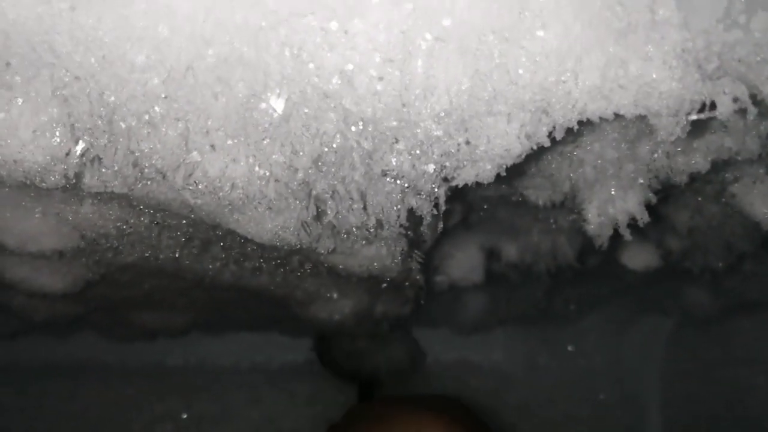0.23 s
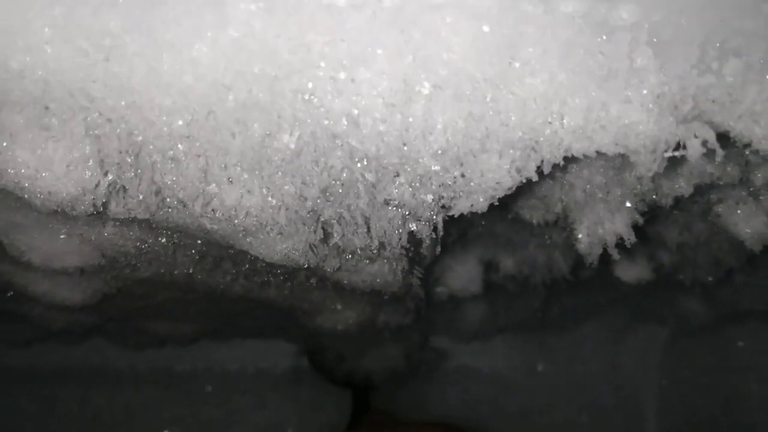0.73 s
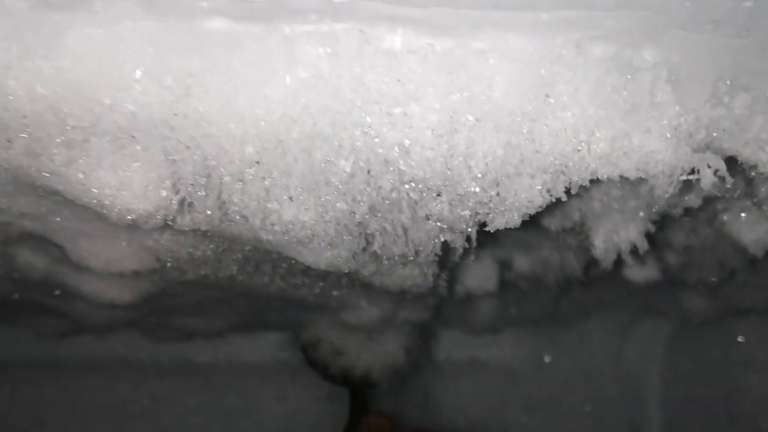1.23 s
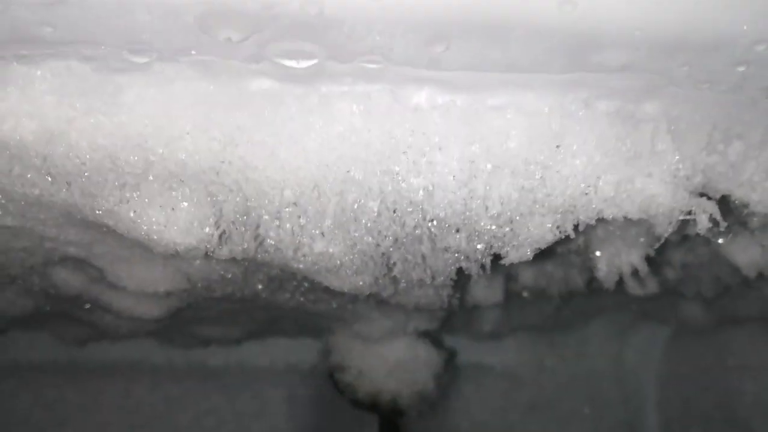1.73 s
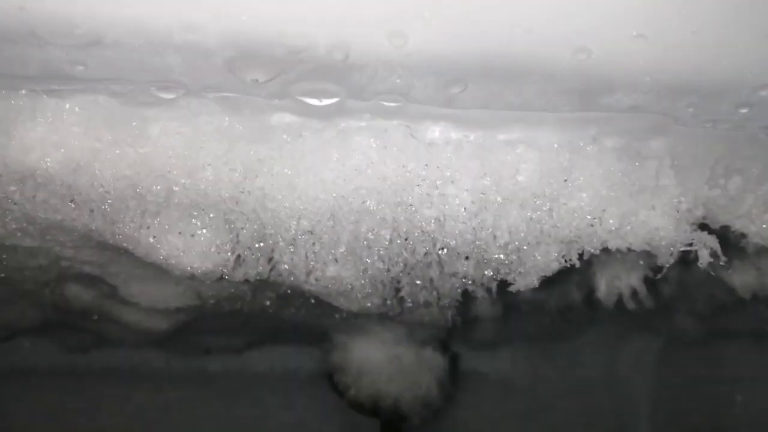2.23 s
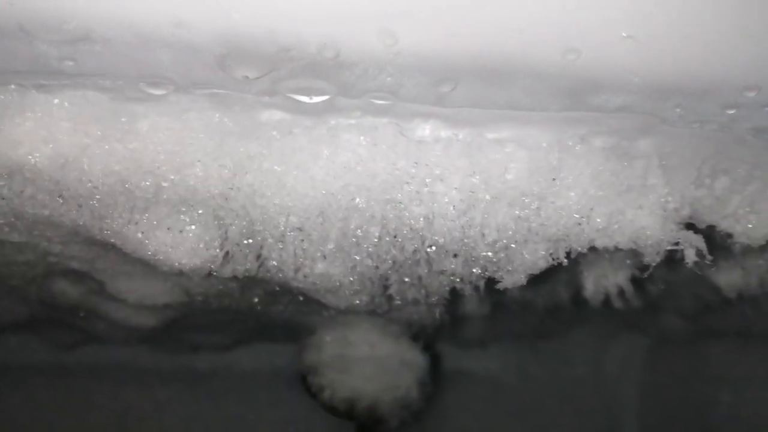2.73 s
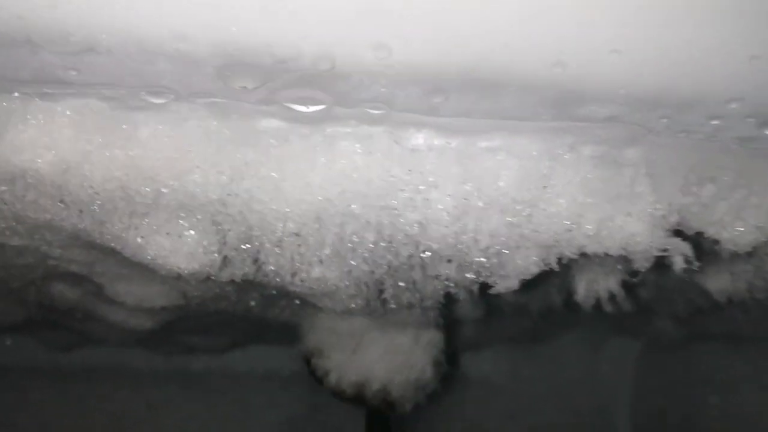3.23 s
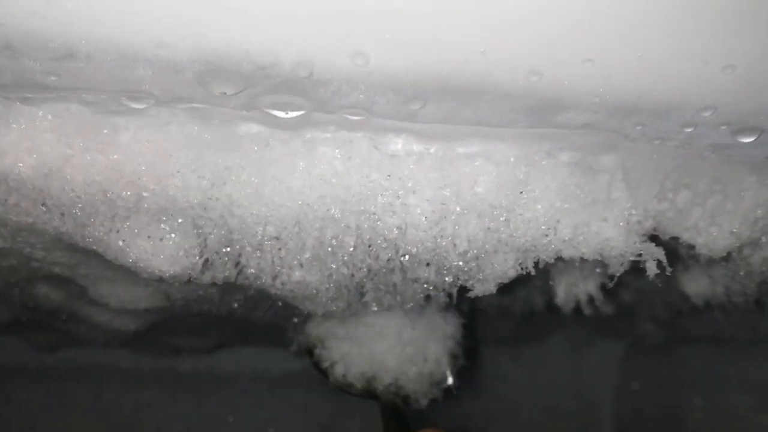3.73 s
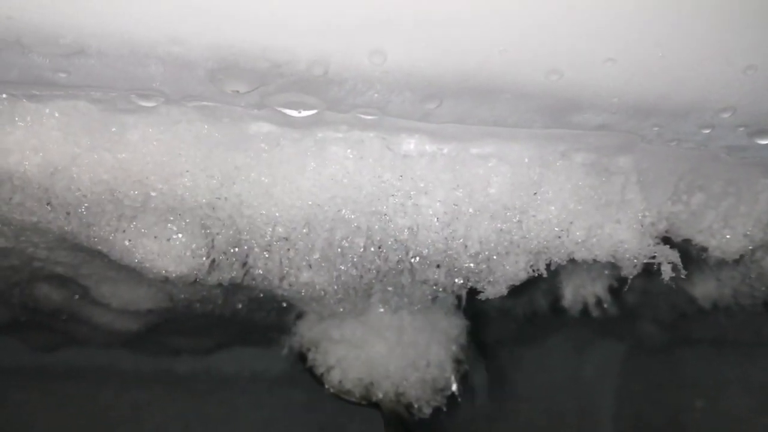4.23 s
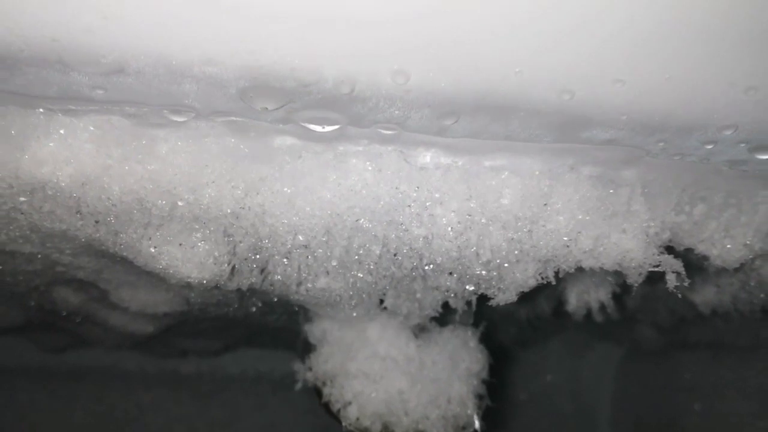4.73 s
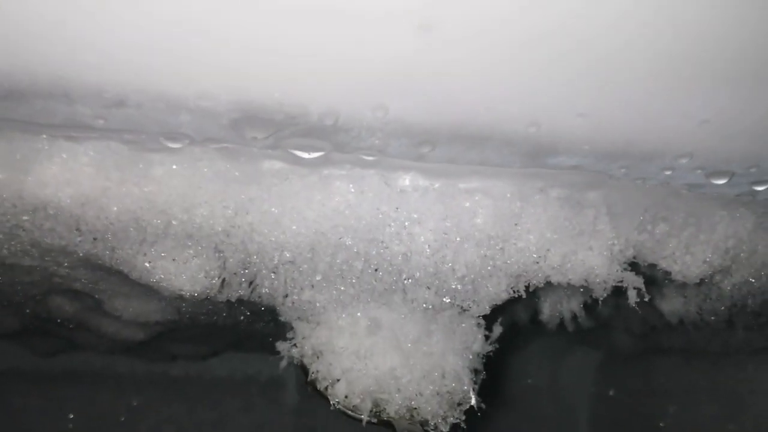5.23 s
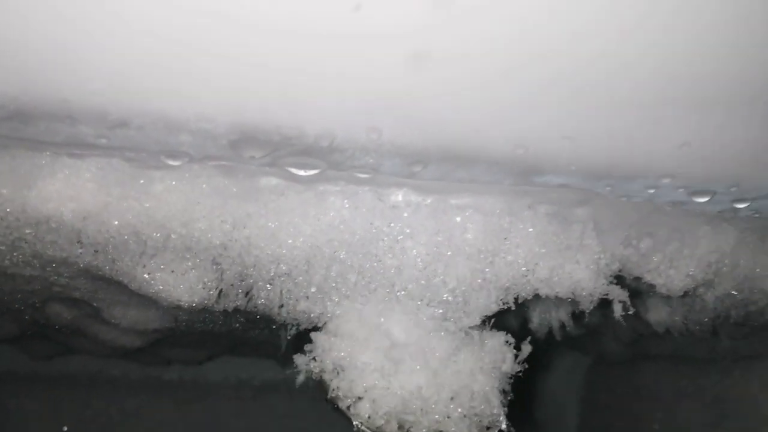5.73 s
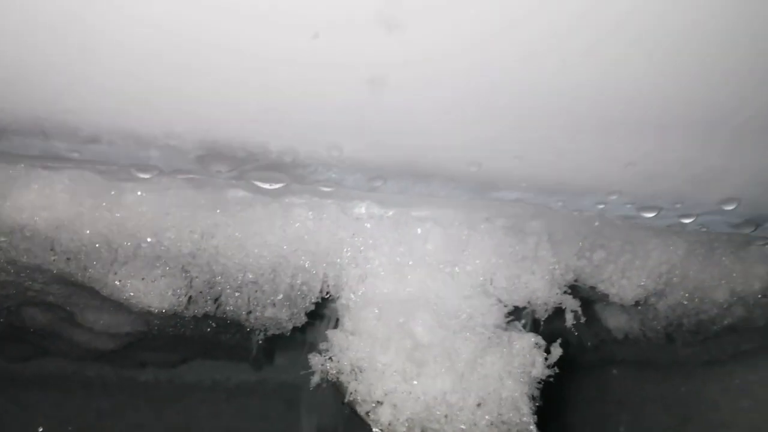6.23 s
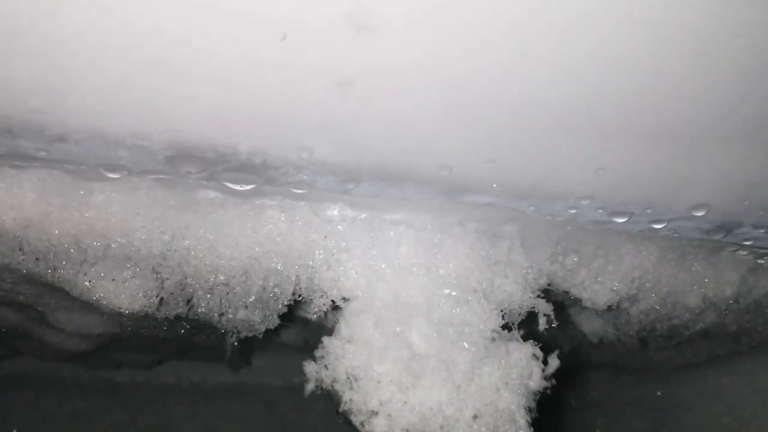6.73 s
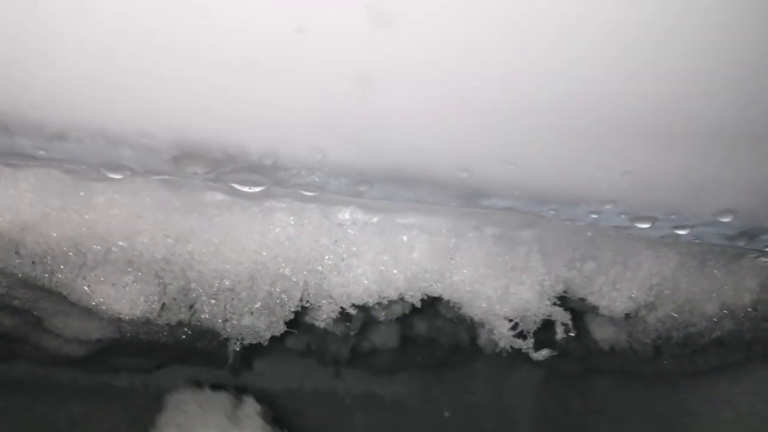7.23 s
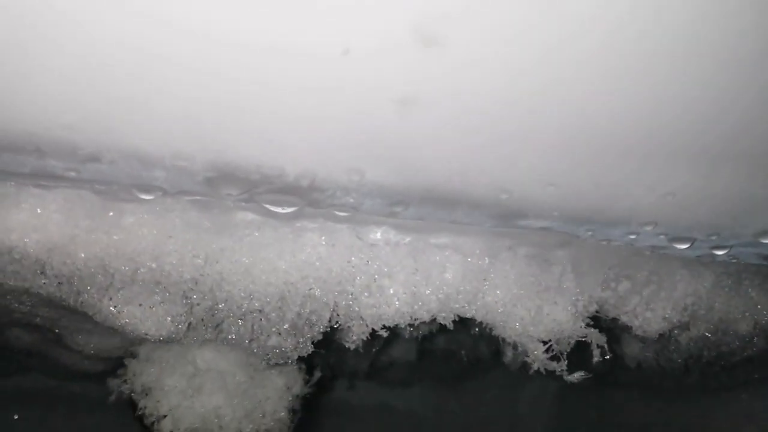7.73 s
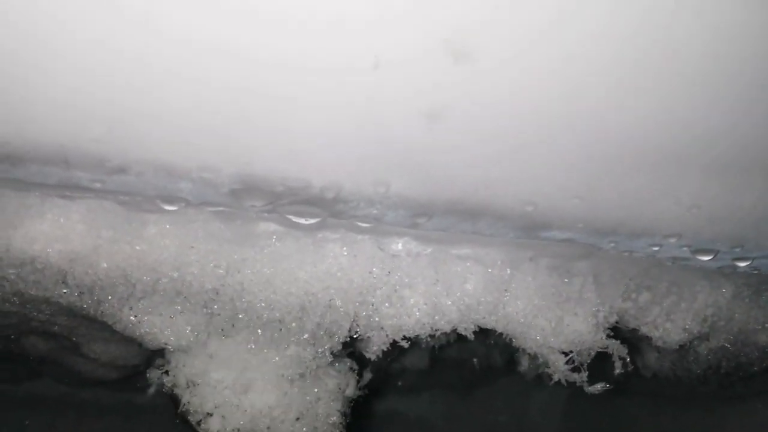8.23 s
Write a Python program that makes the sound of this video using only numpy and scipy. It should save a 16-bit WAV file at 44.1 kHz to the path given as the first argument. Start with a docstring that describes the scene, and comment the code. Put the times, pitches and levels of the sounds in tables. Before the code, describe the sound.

Close, scratchy scraping of thick ice, uneven and crackling with hollow booms, stops for half a second, then restarts softer above quiet appliance rumble.

```python
"""A blade scrapes thick frost off the wall of a freezer, close to the left microphone, over faint hum and hiss.
From the start crushed ice grains ring the wall, the blade and the air of the cabinet; the stroke slips and
sticks, and lumps of ice thud between about 1 and 3 s. Near 6.8 s the stroke pauses, fingers nudge the right
microphone in low bumps and crystals snap; near 7.4 s the scraping resumes further along, with late snaps.
Noise, sparse clicks and short bursts drive resonances; thuds and bumps are shaped sines."""
import sys
import numpy as np
from scipy import signal
from scipy.io import wavfile

SR = 44100
rng = np.random.default_rng(int(sys.argv[2]) if len(sys.argv) > 2 else 0)


def generate_wav(signal):
    """Clip the signal to [-1, 1] and save it as 16-bit WAV at the path in sys.argv[1]."""
    frames = np.transpose(np.atleast_2d(signal))
    scaled = np.clip(frames, -1, 1) * 32767
    pcm = np.round(scaled).astype(np.int16)
    wavfile.write(sys.argv[1], SR, pcm)


N = 374364
T = np.arange(N) / SR
STEPS = np.arange(0, N, 128) / SR  # coarse times for slow controls, s


def gain_of(db):
    """Logarithmic level: decibels become an amplitude ratio."""
    return 10 ** (np.asarray(db) / 20)


def evened(x):
    """Normalization: the signal is scaled to an rms of one."""
    return x / np.sqrt(np.mean(x ** 2) + 1e-20)


def curve(points, t):
    """Linear interpolation of a table of times and values."""
    return np.interp(t, *np.transpose(points))


def read(points, hz):
    """Interpolation of a spectrum on a logarithmic frequency axis."""
    f, value = np.transpose(points)
    return np.interp(np.log(hz + 1), np.log(f + 1), value)


def wander(per_s, t):
    """Random modulation: normal deviates, per_s of them a second, joined by straight lines."""
    knots = rng.standard_normal(4000)
    return np.interp(t * per_s, np.arange(len(knots)), knots)


def shuffled(x):
    """Decorrelation: the same grains push with random signs."""
    return x * rng.choice([-1., 1.], N)


def ring(x, hz, width, count=2):
    """Resonance with a peak gain of one; two passes give steep skirts."""
    b, a = signal.iirpeak(hz, hz / width, SR)
    for _ in range(count):
        x = signal.lfilter(b, a, x)
    return x


def spin(turns):
    """Phasor: a pointer of unit length that has made so many turns."""
    angle = (2 * np.pi * (turns % 1)).astype(np.float32)
    return np.cos(angle) + 1j * np.sin(angle)


def glide(x, hz, width):
    """Heterodyned resonance of moving pitch: shift to zero, smooth twice, shift back; complex result."""
    turn, r = spin(np.cumsum(hz) / SR), np.exp(-np.pi * width / SR)
    shifted = x * np.array([turn.real, -turn.imag])
    along, across = signal.lfilter([(1 - r) ** 2], [1, -2 * r, r * r], shifted)
    return 2 * turn * (along + 1j * across)


def add(mix, s, sound):
    """Superposition: a sound is summed in from time s."""
    part = mix[..., round(s * SR):][..., :sound.shape[-1]]
    part += sound[..., :part.shape[-1]]


def placed(x, right_db):
    """Level difference between channels: the right gets the same wave scaled by right_db."""
    return np.array([x, gain_of(right_db) * x])


# spectrum of the background: pitch_hz, relative density_db (per Hz)
HUM_SPECTRUM = [(15, -15), (33, -8), (50, -30), (106, -11.5), (168, -29.5), (276, -27), (329, -29),
                (524, -32), (910, -37.5), (1830, -41), (8090, -49.5), (14500, -49.5), (15800, -39)]
# level difference of the background: pitch_hz, left_over_right_db
HUM_LEFT_OVER_RIGHT = [(30, 8.5), (60, -17), (130, 8), (640, 6), (3100, 5), (6800, 7), (12500, 6),
                       (14800, 11)]
# coherence of the two channels: pitch_hz, likeness (0-1)
HUM_LIKENESS = [(30, 0.28), (130, 1), (290, 0.73), (640, 0.046)]
HUM_RMS_DB = -56.5  # over both channels


def hum():
    """Shaped noise of partial coherence: low appliance rumble and microphone hiss, lumpy under 70 Hz."""
    frames, hz = N // 512 + 5, np.fft.rfftfreq(2048, 1 / SR)
    t = np.arange(frames) * 512 / SR
    a, b, c, d = rng.standard_normal((frames, 1025, 4)).T
    likeness = np.clip(read(HUM_LIKENESS, hz), -1, 1)[:, None]
    left, other = a + 1j * b, c + 1j * d
    right = likeness * left + np.sqrt(1 - likeness ** 2) * other
    lumps_db = 3.1 * wander(10.0, t) * (hz < 70)[:, None]
    tilt_db = read(HUM_LEFT_OVER_RIGHT, hz)[:, None] / 2
    level_db = read(HUM_SPECTRUM, hz)[:, None] + lumps_db + np.array([tilt_db, -tilt_db])
    z = np.array([left, right]) * gain_of(level_db)
    noise = signal.istft(z, nperseg=2048, noverlap=1536)[1][:, :N]
    return gain_of(HUM_RMS_DB) * evened(noise)


def cabinet(x):
    """Reverberation: a small hard-walled box answers with sparse taps that decay exponentially."""
    t = np.arange(SR // 5) / SR
    signs = rng.choice([-1., 1.], (2, len(t)))
    taps = signs * (rng.random((2, len(t))) < .05) * gain_of(-60 * t / 0.16)  # t60 0.16 s
    return signal.oaconvolve(x, taps / np.linalg.norm(taps[0]), axes=1)[:, :N]


# fingers nudge the right microphone: start_s, peak_db, pitch_hz, length_s
NUDGES = [(6.757, -38, 56.4, 0.02), (7.124, -46, 74.4, 0.066), (7.212, -50, 50, 0.047),
          (7.46, -42, 40, 0.05)]


def bumps():
    """Transient displacement: each bump is a windowed slow sine, on the right only."""
    out = np.zeros((2, N))
    for s, db, hz, length in NUDGES:
        t = np.arange(0, length, 1 / SR)
        window = signal.windows.tukey(len(t), .6)
        add(out[1], s, -gain_of(db) * np.sin(2 * np.pi * hz * t) * window)
    return out


# single crystals snap: start_s, left peak_db, pitch_hz, width_hz
CRYSTAL_SNAPS = [(6.785, -42, 5540, 2200), (7.068, -46, 15000, 3000), (7.331, -34.5, 8550, 2560),
                 (8.256, -31.5, 8700, 2500), (8.417, -33, 15000, 1200), (8.457, -30, 15000, 1200)]


def snaps():
    """Impulsive fracture: a brief decaying noise burst excites a bright resonance."""
    out, t = np.zeros((2, N)), np.arange(SR // 5) / SR
    for s, db, hz, width in CRYSTAL_SNAPS:
        burst = rng.standard_normal(len(t)) * gain_of(-60 * t / 0.016)  # t60 0.016 s
        snap = ring(burst, hz, width)
        add(out, s, placed(gain_of(db) * snap / abs(snap).max(), -28.0))
    return out


# a lump of ice thuds on the wall: time_s, level_db (before rise and decay), pitch_hz, t60_s
ICE_THUDS = [(0.988, -16.5, 585, 0.1), (1.259, -4.5, 395, 0.089), (1.534, -19.5, 392, 0.07),
             (2.852, -26, 282, 0.38), (2.853, -25.5, 132, 0.47), (3.111, -5, 346, 0.027)]


def thuds():
    """Damped free vibration: a sine swells over 9.1 ms while it decays exponentially."""
    out, t = np.zeros((2, N)), np.arange(SR // 5) / SR
    for s, db, hz, t60 in ICE_THUDS:
        envelope = gain_of(db - 60 * t / t60) * np.minimum(t / 0.0091, 1)
        add(out, s - .008, placed(envelope * np.sin(2 * np.pi * hz * t), -10.0))
    return out


# pressure of the stroke as the scrape level: time_s, level_db (before any ringing)
STROKE_LEVEL = [(0, -60.5), (.15, -52.5), (.21, -39.5), (.34, -34), (1.1, -31.5), (1.3, -34.5), (1.6, -41),
                (1.67, -35), (1.825, -32.5), (1.85, -40), (2.0, -40.5), (2.37, -36), (2.39, -29),
                (2.47, -28.5), (2.56, -41.5), (2.64, -46), (2.83, -42), (2.93, -39.5), (3.08, -31),
                (3.7, -31.5), (3.81, -42), (4.43, -42), (4.6, -45), (4.8, -32), (4.91, -33.5), (5.0, -39.5),
                (5.42, -43.5), (5.53, -35), (5.93, -40.5), (6.3, -43), (6.57, -56), (6.6, -62.5),
                (6.66, -64.5), (6.785, -53), (6.81, -86), (7.32, -81), (7.35, -69), (7.4, -74),
                (7.43, -67.5), (7.47, -53.5), (7.55, -49), (7.72, -42), (8.0, -40), (8.49, -45.5)]
AVERAGE_STROKE_DB = -40


def pressure_db(t):
    """Relative level: how far the stroke is over an average one."""
    return curve(STROKE_LEVEL, t) - AVERAGE_STROKE_DB


# mode of the cabinet air: pitch_hz, width_hz, right_under_left_db
AIR_MODE = (128, 10, -10.5)
# mode of the wall panel: pitch_hz, width_hz, right_under_left_db
PANEL_MODE = (281.2, 70, -8.5)
# the hand heaves on the wall and the air booms: time_s, top_db (before BOOM_GAIN_DB)
HEAVE_SWELLS = [(.52, -39), (.83, -38), (1.22, -29), (1.77, -35.5), (2.19, -33.5), (2.47, -36.5),
                (3.1, -32), (3.3, -33.5), (3.53, -44), (3.9, -37.5), (4.35, -34.5), (4.539, -33),
                (4.87, -38.5), (5.87, -34.5), (8.0, -48), (8.27, -42)]
# wall panel at an average stroke: time_s, level_db (before BOOM_GAIN_DB)
PANEL_CURVE = [(.3, -58), (1.3, -49), (1.9, -44), (2.4, -49.5), (3.0, -47.5), (3.5, -50), (3.9, -46),
               (4.8, -48), (5.5, -41.5), (6.3, -42.5), (7.5, -45.5)]
HEAVE_RISE_DB_PER_S, HEAVE_FALL_DB_PER_S = 93, 220
AIR_DB, AIR_PER_DB = -51, 0.78  # at an average stroke, before BOOM_GAIN_DB; dB per dB of pressure
BOOM_GAIN_DB = 5.0


def boom():
    """Forced resonance: jerks of the hand ring cabinet air and wall panel with the stroke; heaves swell the air."""
    s, top_db = np.transpose(HEAVE_SWELLS)[:, :, None]
    rise_db = HEAVE_RISE_DB_PER_S * np.maximum(s - STEPS, 0)
    fall_db = HEAVE_FALL_DB_PER_S * np.maximum(STEPS - s, 0)
    swell_db = (top_db - rise_db - fall_db).max(0)
    air = np.hypot(gain_of(AIR_DB + AIR_PER_DB * pressure_db(STEPS)), gain_of(swell_db))
    wall = gain_of(curve(PANEL_CURVE, STEPS) + pressure_db(STEPS))
    out = np.zeros((2, N))
    for (hz, width, right_db), level, count in zip((AIR_MODE, PANEL_MODE), (air, wall), (1, 2)):
        impulses = rng.standard_normal(N) * (rng.random(N) < 1500 / SR)  # about 1500 a second
        jerks = ring(impulses, 1.118 * hz, 170)
        unit = np.std(ring(jerks, hz, width, count=count))
        driven = ring(jerks * np.interp(T, STEPS, level), hz, width, count=count)
        out += placed(driven / unit, right_db)
    return gain_of(BOOM_GAIN_DB) * out


# loose powder heaps on the blade: time_s, level_db (over the stroke, before SCRAPE_GAIN_DB)
POWDER_LEVEL = [(.1, -3), (.5, -8), (3.7, -10.5), (4.6, -4), (6.0, 9), (6.5, 6.5), (7.6, -2)]
POWDER_HZ, POWDER_WIDTH_HZ = 4570, 1870


def powder(drive):
    """Heavily damped response: loose powder has no ring of its own, only a wide hiss."""
    hiss = ring(drive * gain_of(curve(POWDER_LEVEL, T)), POWDER_HZ, POWDER_WIDTH_HZ)
    return placed(hiss, -28.0)


CRYSTAL_LO_HZ, CRYSTAL_HI_HZ, CRYSTAL_WIDTH_HZ = 996, 5480, 108
CRYSTALS_PER_S = 2500  # average, all pitches together
CRYSTAL_DB, CRYSTAL_TILT_DB = 4, -10.5  # before SCRAPE_GAIN_DB; tilt spread over the pitches, low to high


def crystals(drive, count=14):
    """Random impulse excitation: some grains break off whole, each pinging at one of 14 pitches."""
    which, out = rng.integers(0, count, N), np.zeros(N)
    loose = drive * (rng.random(N) < CRYSTALS_PER_S / SR) * np.sqrt(SR / CRYSTALS_PER_S)
    for k, hz in enumerate(np.geomspace(CRYSTAL_LO_HZ, CRYSTAL_HI_HZ, count)):
        ping = ring(loose * (which == k), hz, CRYSTAL_WIDTH_HZ, count=1)
        out += gain_of(CRYSTAL_TILT_DB * k / count) * ping
    return placed(gain_of(CRYSTAL_DB) * np.sqrt(count) * out, -20.0)


# the blade's ring bends with its angle: time_s, pitch_hz, level_db (before SCRAPE_GAIN_DB)
BLADE_RING = [(0, 3330, 16), (.36, 3380, 13), (.6, 3420, 10), (1.2, 3170, -2), (2.9, 2970, 10.5),
              (3.5, 2890, -1), (4.6, 2630, 7), (5.3, 2970, 14), (6.3, 2956, 22.5), (6.55, 3100, 18),
              (6.78, 2850, 17), (7.35, 3130, 26.5), (7.45, 3140, 6)]


def blade(drive, width=220):
    """Time-varying resonance: the pitch of the blade's ring follows its angle."""
    s, hz, db = np.transpose(BLADE_RING)
    tone = glide(drive * gain_of(np.interp(T, s, db)), np.interp(T, s, hz), width)
    return placed(tone.real, -27.0)


# the blade breaks free and crunches: start_s, level_db (of force), length_s
BLADE_SLIPS = [(0.277, -43, 0.029), (0.335, -29.5, 0.0094), (0.442, -34.5, 0.0064), (0.553, -35, 0.0052),
               (0.744, -27.5, 0.0035), (0.85, -41, 0.0051), (1.246, -37, 0.028), (1.529, -35.5, 0.0078),
               (1.589, -35, 0.01), (1.646, -41, 0.0061), (1.786, -33, 0.0097), (2.118, -32, 0.0049),
               (2.164, -41, 0.009), (2.203, -33, 0.0086), (2.232, -32.5, 0.0064), (2.263, -34, 0.0089),
               (2.301, -35.5, 0.013), (2.608, -31.5, 0.0076), (2.728, -30, 0.0036), (2.783, -39.5, 0.011),
               (2.798, -32, 0.0078), (2.84, -25.5, 0.0081), (2.918, -32.5, 0.0088), (2.944, -31, 0.0048),
               (2.956, -26, 0.0043), (2.992, -33, 0.013), (3.249, -29.5, 0.0093), (4.505, -34, 0.013),
               (4.542, -36, 0.011), (4.615, -42, 0.0073), (4.654, -28, 0.009), (4.677, -37, 0.011),
               (4.708, -36.5, 0.007), (4.724, -33, 0.0068), (4.766, -27, 0.008), (4.8, -31, 0.0067),
               (5.904, -40, 0.018), (6.396, -52, .005), (6.493, -50, 0.004), (6.547, -45.5, .006),
               (7.111, -65.5, 0.027), (7.329, -59, 0.0072)]
# the blade hangs for an instant: centre_s, length_s, dip_db
BLADE_STICKS = [(0.272, 0.03, -16), (0.319, 0.0099, -20), (1.21, 0.015, -15), (1.227, 0.013, -9),
                (1.521, 0.014, -10), (1.578, 0.011, -5), (1.626, 0.038, -6), (2.183, 0.012, -5),
                (2.245, 0.11, -8.5), (2.89, 0.097, -11), (4.245, 0.06, -8.5), (4.694, 0.066, -8.5),
                (4.747, 0.025, -6), (4.481, 0.051, -17), (4.529, 0.046, -25), (4.59, 0.099, -15),
                (4.939, 0.046, -19), (7.591, 0.06, -11)]


def crunch():
    """Stick-slip friction: crushed grains are dense clicks of uneven size, in clumps, slips and stalls."""
    grains = rng.standard_normal(N) * gain_of(3.08 * np.minimum(rng.exponential(1, N), 6))
    clumps = gain_of(2.0 * wander(150, T) + 1.46 * wander(45, T))
    force = gain_of(curve(STROKE_LEVEL, T)) * evened(clumps)
    for s, length, db in BLADE_STICKS:
        near = slice(max(round((s - length) * SR), 0), round((s + length) * SR))
        force[near] *= gain_of(db * np.exp(-((T[near] - s) / (length / 2)) ** 4))
    t = np.arange(SR // 10) / SR
    for s, db, length in BLADE_SLIPS:  # sudden start, a sagging hold, a quick end
        hold_db = db - 5 * t / length - 44000 * np.maximum(t - length, 0)
        add(force, s - .001, gain_of(hold_db) * np.minimum(t / 0.00048, 1))
    return evened(grains) * force


DRIFT, DRIFT_PER_S = .014, 12  # share by which a mode's pitch typically strays, and how often


def mode(drive, hz, width, db, right_db):
    """Modal response under a shifting contact: pitch and level stray, and phase drifts at the right."""
    pitch = hz * (1 + DRIFT * wander(DRIFT_PER_S, T))
    level = gain_of(db + 2.65 * wander(7, STEPS))
    x = glide(drive * np.interp(T, STEPS, level), pitch, width)
    phase = min(hz / 1200, 1) * (2.1 * rng.standard_normal() + 0.67 * wander(14, STEPS))  # radians
    turned = x * spin(np.interp(T, STEPS, phase / (2 * np.pi)))
    return np.array([x.real, gain_of(right_db) * turned.real])


# where the blade is along the wall: time_s, place (0-4)
BLADE_PLACE = [(0, 2.23), (.4, 0), (1.3, 0), (1.9, 1.28), (2.4, 2.63), (2.7, 0.5), (3, 2.1), (3.4, 1.5),
               (3.75, 2.5), (4.4, 2), (7.36, 2), (7.4, 4)]
# what the scraping rings: pitch_hz, width_hz, level_db at places 0 to 4 (five columns), right_under_left_db
BODY_MODES = [(163.5, 31, 24.5, 27, 17, 13, 20, -4.5), (386, 127, 27.5, 23.5, 7.5, 11, 1, -7.5),
              (474.6, 93, 25, 24.5, 10.5, 22, 16, -8.5), (559, 77, 28.5, 16.5, 7.5, 10, 11.5, -0.5),
              (655, 182, 28.5, 22.5, 17, 11, 15, -5.5), (850, 103, 24, 23, 10, 15, 9.5, -23.5),
              (970, 160, 23.5, 14, 15, 15, 11, -6.5), (1270, 390, -6, -3, 4.5, -12, 6, -7),
              (1563, 177, 17.5, 13, 9.5, 9, 15.5, -19.5), (1729, 57, 12, 3, 12, 14, 6, -10),
              (1863, 194, 9.5, 9, 5.5, 7, 6, -18.5), (2346, 406, -4, 8.5, 5.5, 2, 9.5, -23),
              (2680, 515, 7.5, 7, 12, -8, 7, -15.5), (3430, 600, 1.5, -14, -8, -3, 1, -22),
              (3859, 223, 6.5, 5, 10, 0, 5, -22.5), (4600, 220, -10, 3, -1.5, 5, -2, -26.5),
              (5095, 380, 4.5, 9.5, 6.5, 1, 7, -19), (5820, 520, -3, -13, -9.5, -6, -6, -29.5)]
# the fine grains' own ring: pitch_hz, width_hz, level_db at places 0 to 4 (five columns), right_under_left_db
FINE_MODES = [(7000, 1170, -6, -8.5, -3.5, -11, -7.5, -25), (8210, 480, -4.5, -3.5, -3, -17, -5.5, -54),
              (9840, 1800, -19, -18.5, -13.5, -20, -13, -43), (11900, 1600, -18, -14, -29, -3, -17, -45),
              (12900, 1440, -1, -2, 5.5, -13, -13, -45), (15160, 880, -8, -4, -6.5, 0, -4, -34)]
# modes under 1.1 kHz: time_s, level_db
LOW_LEVEL = [(.9, -13.5), (1.9, -4.5), (2.3, -8), (2.5, -1), (2.7, -18), (3.03, -9.5), (3.12, -4), (5.3, 0),
             (5.6, 3.5), (6.4, 2), (8.2, 2)]
# modes from 3.6 to 4.9 kHz, felt twice over by the upper one: time_s, level_db
GLINT_LEVEL = [(.7, -1), (1.0, -0.5), (3.2, -8.5), (3.5, 5.5), (3.72, 1), (3.85, 1.5), (4.5, 1.5),
               (6.1, 3.5), (6.35, -14), (7.5, 0)]
# modes from 4.9 to 5.5 kHz: time_s, level_db
RASP_LEVEL = [(.4, -7.5), (1.1, -0.5), (1.55, -4), (1.72, 1), (1.9, -6), (2.35, 3), (2.65, -14.5),
              (3.1, -5), (3.3, -7), (3.5, -24), (3.85, -1), (4.9, -1), (6.2, -18), (6.45, -14), (7.5, -10)]
# fine grains, felt in full over 11 kHz: time_s, level_db
SHEEN_LEVEL = [(1.2, -5.5), (1.75, -0.5), (2.0, -10), (2.48, -7), (2.65, -14.5), (3.1, -9), (4.3, -4.5),
               (4.9, -4.5), (5.6, -1), (5.92, 3), (6.15, -4), (6.35, -1), (7.5, 3), (8.3, 7)]
SHEEN_LOW = 0.27  # share of the sheen's dB felt under 11 kHz
FINE_DB, FINE_PER_DB = -4, 0.2552  # a harder stroke grinds more fine grains: dB per dB of pressure
SCRAPE_GAIN_DB = 2.0


def scrape():
    """Modal superposition: the crunch rings each mode as strongly as the blade's place couples to it."""
    drive = crunch()
    place = curve(BLADE_PLACE, STEPS)
    fine_db = FINE_DB + FINE_PER_DB * pressure_db(STEPS)
    low_db, glint_db = curve(LOW_LEVEL, STEPS), curve(GLINT_LEVEL, STEPS)
    rasp_db, sheen_db = curve(RASP_LEVEL, STEPS), curve(SHEEN_LEVEL, STEPS)
    out = blade(shuffled(drive)) + crystals(drive) + powder(shuffled(drive))
    for k, (hz, width, *couple_db, right_db) in enumerate(BODY_MODES + FINE_MODES):
        db = np.interp(place, np.arange(5), couple_db)
        if hz < 1100:
            db = db + low_db
        if 3600 < hz < 4900:
            db = db + glint_db * (2 if hz > 4300 else 1)
        if 4900 < hz < 5500:
            db = db + rasp_db
        if k >= len(BODY_MODES):
            db = db + fine_db + sheen_db * (1 if hz > 11000 else SHEEN_LOW)
        push = shuffled(drive) if hz > 3600 else drive
        out = out + (-1) ** k * mode(push, hz, width, db, right_db)  # neighbours in opposite phase
    highpass = signal.butter(2, 130, "high", fs=SR)
    return gain_of(SCRAPE_GAIN_DB) * signal.lfilter(*highpass, out)


def scene():
    """Superposition of direct and reverberant sound: scraping and knocks in the cabinet, over the hum."""
    near = scrape() + boom() + thuds() + snaps() + bumps()
    return near + gain_of(-6.5) * cabinet(near) + hum()


def record(dry):
    """Band limiting: a linear-phase lowpass at 15.85 kHz."""
    lowpass = signal.firwin(511, 15850, window=("kaiser", 9), fs=SR)
    return signal.oaconvolve(dry, lowpass[None], "same")


dry = scene()
out = record(dry)
generate_wav(out)
```